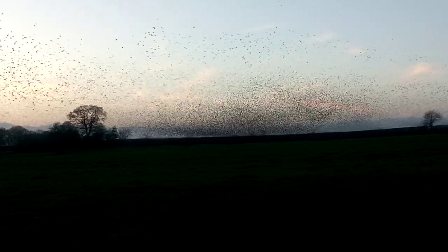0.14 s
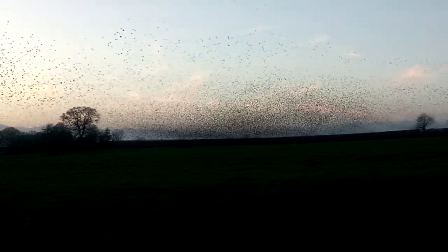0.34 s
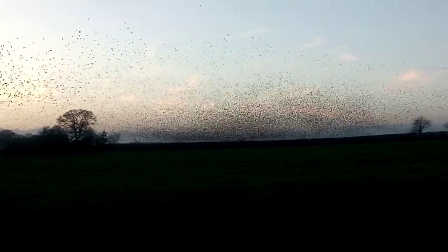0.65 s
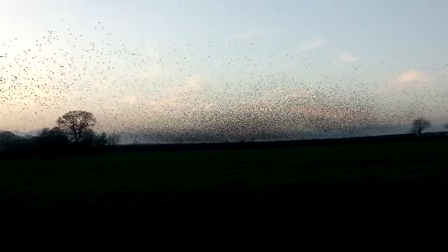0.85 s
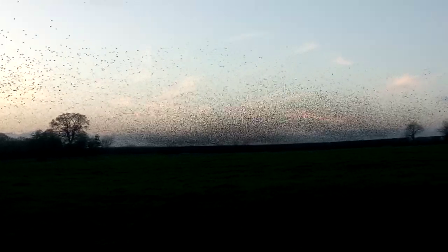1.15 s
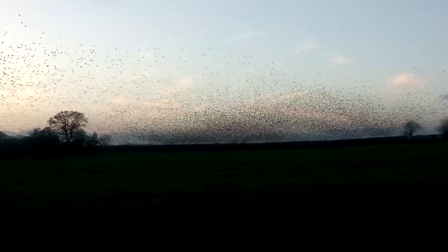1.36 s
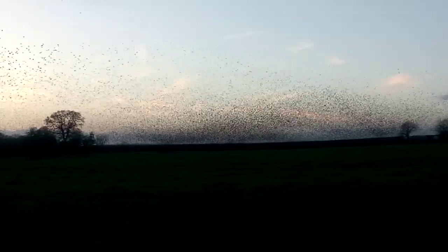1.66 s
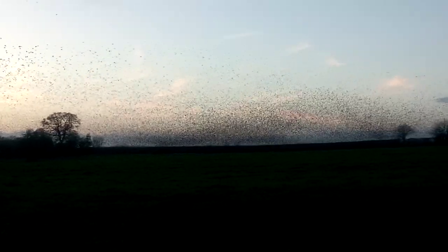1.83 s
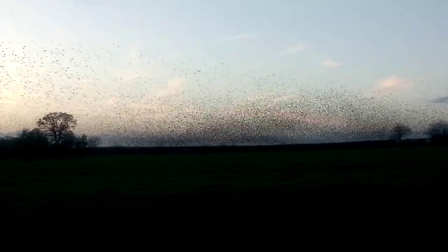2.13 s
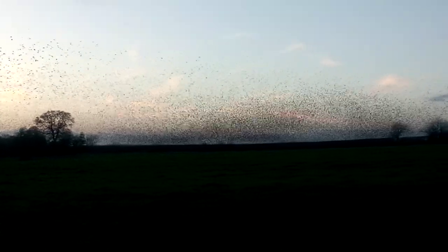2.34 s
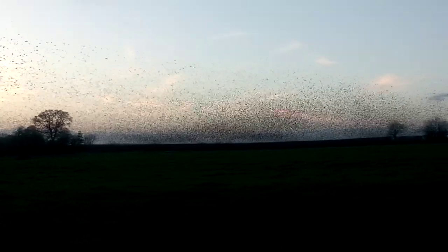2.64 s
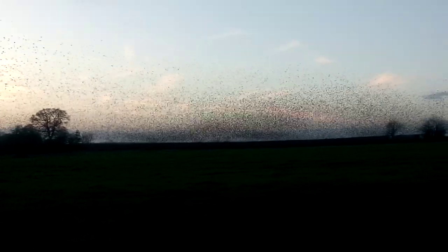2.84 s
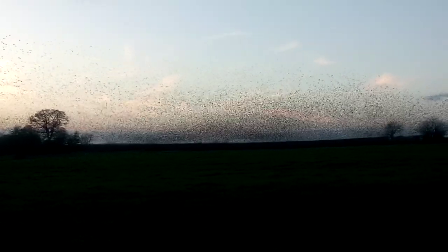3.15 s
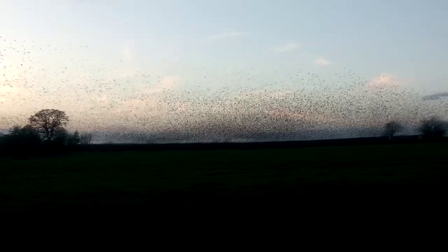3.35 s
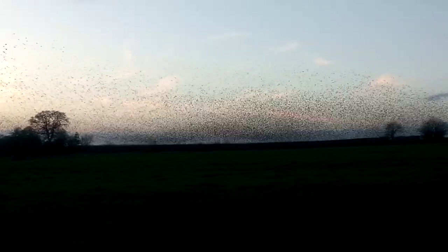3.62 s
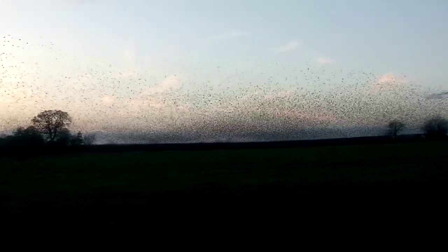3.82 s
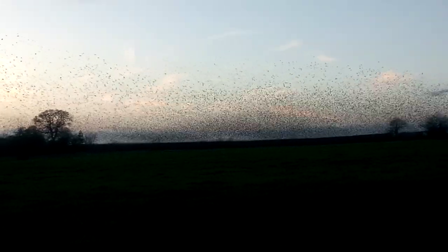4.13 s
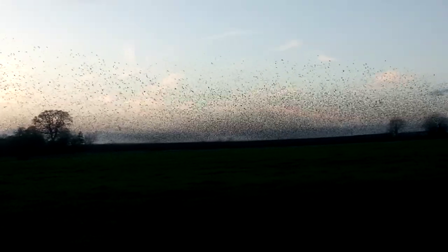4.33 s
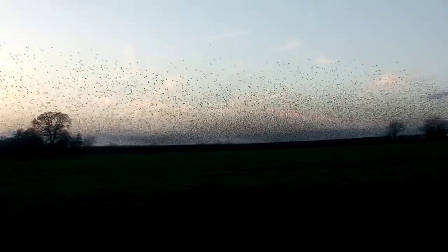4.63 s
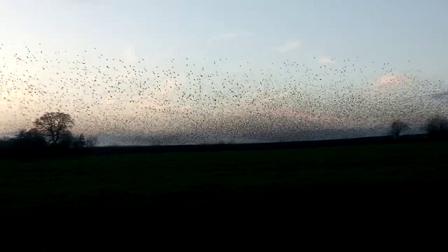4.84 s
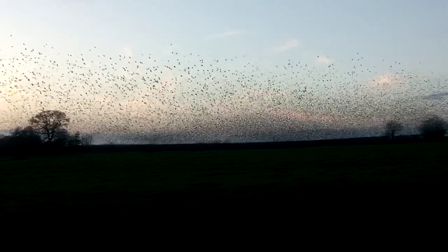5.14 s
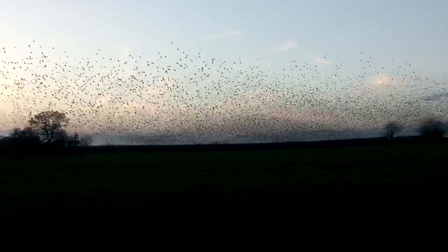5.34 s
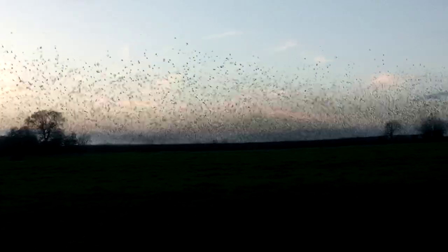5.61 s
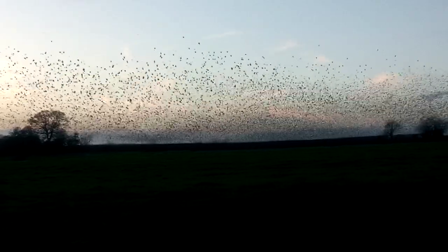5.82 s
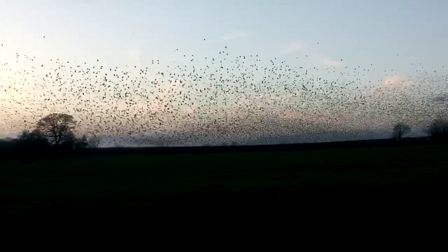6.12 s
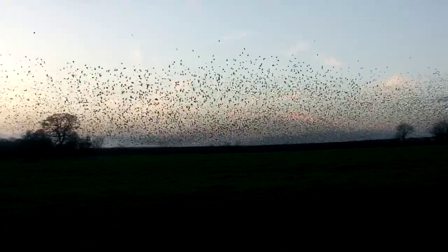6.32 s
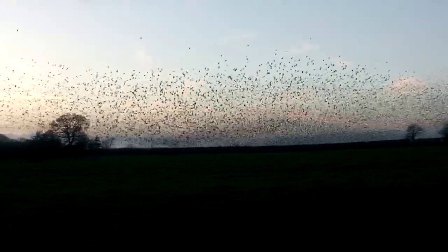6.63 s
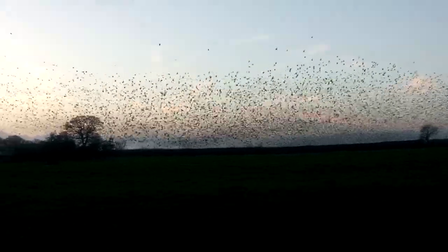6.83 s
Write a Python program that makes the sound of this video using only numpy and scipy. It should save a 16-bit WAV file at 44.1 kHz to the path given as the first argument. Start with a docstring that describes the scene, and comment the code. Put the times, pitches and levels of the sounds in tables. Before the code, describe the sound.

Thousands of starlings over an open field make a continuous bright hiss of wings and blurred chatter. Quick falling chirps and warbles cluster in the first second, then a near bird sings a sharp, fast gliding phrase. Low wind and gusts buffet the microphone, with one heavy double bump midway that briefly dips the sound. More whistles and chirps follow, a far hoarse double call, and the near phrase returns at the end.

```python
"""A huge starling flock wheels over a field at dusk: filtered noise makes a steady hiss of wings and far chatter.
Short gliding tones add twitters, whistles, buzzes, chirps and warbles; filtered noise adds a far rush and wind.
Gusts and bumps strike the microphone; a near bird sings a sharp phrase of gliding tones.
The hardest bumps, halfway, duck the recorder's gain; later a far bird gives a hoarse double call of harmonics.
Faint far tones follow, and the near bird repeats most of its phrase."""
import sys
import numpy as np
from scipy import signal
from scipy.fft import rfft, irfft
from scipy.io import wavfile
from scipy.ndimage import uniform_filter1d

SR = 44100
rng = np.random.default_rng(int(sys.argv[2]) if len(sys.argv) > 2 else 0)


def materialize(psi):
    """Save the field psi as 16-bit PCM at rate SR to the path in sys.argv[1].

    A 1-D psi becomes a single channel; in a 2-D psi each row is a channel.
    """
    bounded = np.clip(np.atleast_2d(psi).T, -1, 1)
    quanta = np.round(bounded * 32767).astype(np.int16)
    wavfile.write(sys.argv[1], SR, quanta)


N = 307377
TIME = np.arange(N) / SR
BINS = np.fft.rfftfreq(N, 1 / SR)

# flock loudness over time, before trims: time_s, wings_db, chatter_db
FLOCK_LEVELS = [(0, -57, -55), (.7, -58, -57.5), (1.4, -59.5, -57.5), (3.3, -59, -57.5),
                (4.2, -56.5, -55.5), (5, -56.5, -56.5), (5.7, -59, -57.5), (6.97, -61, -56.5)]


def gain_of(db):
    """Decibels to amplitude."""
    return 10 ** (np.asarray(db) / 20)


def evened(x):
    """Scales to an rms of one."""
    return x / np.sqrt(np.mean(x ** 2) + 1e-20)


def read(points, hz):
    """Reads a spectrum on a log-frequency axis."""
    point_hz, value = np.transpose(points)
    return np.interp(np.log(hz + 1), np.log(point_hz + 1), value)


def add(mix, start_s, sound):
    """Mixes a sound in at a given time."""
    part = mix[max(round(start_s * SR), 0):][:len(sound)]
    part += sound[:len(part)]


def filtered(x, gain):
    """Applies a gain to each frequency bin."""
    return irfft(rfft(x) * gain, N)


def noise(gain):
    """Steady noise of unit rms with the given gain on each frequency bin."""
    return evened(filtered(rng.standard_normal(N), gain))


def wander(rate_hz):
    """A smooth random curve of unit rms."""
    return noise(np.exp(-(BINS / rate_hz) ** 2))


def patchy(colour, patchy_db, patch_s, patch_hz):
    """Noise whose level drifts in small patches of time and frequency."""
    hz, t, z = signal.stft(rng.standard_normal(N), SR, nperseg=512, noverlap=384)
    patch_frames = max(round(patch_s / t[1]), 1)
    patch_bins = max(round(patch_hz / hz[1]), 1)
    patches = uniform_filter1d(rng.standard_normal(z.shape), patch_frames, axis=1)
    patches = evened(uniform_filter1d(patches, patch_bins, axis=0))
    z = z * gain_of(read(colour, hz)[:, None] + patchy_db * patches)
    return signal.istft(z, SR, nperseg=512, noverlap=384)[1][:N]


def band_rms(x, low_hz, high_hz):
    """Strength of x between two frequencies."""
    return np.std(filtered(x, (BINS > low_hz) * (BINS < high_hz)))


def field(x, wet_db, t60_s):
    """Sparse echoes scattered by the ground, hedges and trees."""
    t = TIME[:SR]
    taps = rng.choice([-1., 1.], SR) * (rng.random(SR) < 2000 / SR) * (t > .002)
    tail = taps * gain_of(-60 * t / t60_s)
    return x + gain_of(wet_db) * signal.fftconvolve(x, tail / np.linalg.norm(tail))[:N]


def slur(length_s, start_hz, middle_hz, end_hz, warble=0, warble_per_s=0):
    """One pure note whose pitch bends through three points and may warble on the way."""
    u = np.linspace(0, 1, max(int(length_s * SR), 8))
    hz = np.polyval(np.polyfit([0, .5, 1], [start_hz, middle_hz, end_hz], 2), u)
    hz = hz * (1 + warble * np.sin(2 * np.pi * warble_per_s * length_s * u))
    return np.sin(2 * np.pi * np.cumsum(hz) / SR) * signal.windows.tukey(len(u), .5)


def slurs(rows):
    """Plays a table of bending notes."""
    out = np.zeros(N)
    for start_s, length_s, start_hz, middle_hz, end_hz, db in rows:
        add(out, start_s, gain_of(db) * slur(length_s, start_hz, middle_hz, end_hz))
    return out


def flock(split_hz=3600, wings_db=-0.52, chatter_db=-3.0):
    """Thousands of wings make the lower hiss; thousands of far calls blur into the upper one."""
    # hiss spectrum: freq_hz, density_rel_db
    hiss_colour = [(290, -19), (500, -17.5), (644, -10.5), (998, -20), (1140, -12.5), (1510, -12.5),
                   (1940, -1.5), (2430, 0.5), (3480, -5), (4730, 2.5), (6340, -5), (7640, -16), (8720, -26),
                   (9320, -43), (12000, -61), (22000, -120)]
    time_s, wing_level, chatter_level = np.transpose(FLOCK_LEVELS)
    hiss = patchy(hiss_colour, patchy_db=1.62, patch_s=0.038, patch_hz=350)
    wings = filtered(hiss, 1 / (1 + (BINS / split_hz) ** 8))
    far_calls = hiss - wings
    wing_gain = gain_of(np.interp(TIME, time_s, wing_level) + wings_db)
    call_gain = gain_of(np.interp(TIME, time_s, chatter_level) + chatter_db)
    return (wings / band_rms(hiss, 1800, 3200) * wing_gain
            + far_calls / band_rms(hiss, 4000, 7000) * call_gain)


def chatter(count=760, base_db=-59.7, spread_db=2.5, low_hz=2000, high_hz=7800, bend=0.17,
            air_db=-16, warble=.012, gap_s=.06, swell_db=1.6):
    """Birds each give three short twitters, fading; all swell together, and air dulls the high ones."""
    out = np.zeros(N)
    for when, height, length, sweep, arch, near, pace in rng.random((count, 7)):
        hz = low_hz + (high_hz - low_hz) * np.sqrt(height)
        tilt = bend * (sweep - .4) * (1 - height ** 2 / 2)
        middle_hz = hz * (1 + bend * (arch - .5) / 2)
        note = slur(0.01367 + 0.0399 * length ** 2, hz * (1 + tilt), middle_hz, hz * (1 - tilt),
                    warble, warble_per_s=60 * (.5 + pace))
        for k in range(3):
            start_s = when * N / SR + k * gap_s * (.5 + pace + length)
            db = base_db + spread_db * (2 * near - 1.5 - k / 2) + air_db * height ** 2
            add(out, start_s, note * gain_of(db))
    time_s, _, level = np.transpose(FLOCK_LEVELS)
    swell = np.interp(TIME, time_s, level - level.mean()) + swell_db * wander(rate_hz=3)
    return field(out * gain_of(swell), wet_db=-8, t60_s=0.45)


def wind(trim_db=3, lumpy_db=3.0):
    """Lumpy low-frequency turbulence at the microphone port."""
    # wind level before trim: time_s, level_db
    wind_levels = [(0.0, -60), (0.41, -53), (0.7, -62), (1.46, -55), (1.61, -50), (2.1, -57.5),
                   (2.55, -55.5), (2.8, -63), (3.2, -48.5), (3.55, -60.5), (5.61, -64.5), (6.05, -60),
                   (6.25, -56.5), (6.44, -66), (6.97, -64.5)]
    # wind spectrum: freq_hz, density_rel_db
    wind_colour = [(20, -44), (50, -1), (100, 1.5), (165, -6), (230, -16), (330, -25), (500, -41),
                   (900, -65.5)]
    level_db = np.interp(TIME, *np.transpose(wind_levels)) + trim_db
    return noise(gain_of(read(wind_colour, BINS))) * gain_of(level_db + lumpy_db * wander(rate_hz=12))


def microphone(hiss_db=-69.5):
    """The recorder's own faint hiss."""
    # hiss spectrum: freq_hz, density_rel_db
    hiss_colour = [(100, 29.5), (1000, -3), (9000, -8.5), (13500, -12), (14600, 5), (15700, 7),
                   (17000, -18)]
    return gain_of(hiss_db) * noise(gain_of(read(hiss_colour, BINS)))


def whistles():
    """Long thin bending notes from the edge of the flock."""
    # whistled notes: start_s, length_s, start_hz, middle_hz, end_hz, rel_level_db
    whistle_rows = [(0, 0.14, 5560, 5400, 5340, -51.5), (.407, 0.22, 8060, 8900, 8800, -76),
                    (.956, 0.28, 8940, 8990, 7900, -76), (4.36, 0.16, 4720, 4780, 4980, -52),
                    (4.37, 0.15, 4810, 5030, 5030, -50.5), (4.46, 0.18, 4930, 5030, 5090, -54.5),
                    (4.42, 0.17, 2495, 2543, 2500, -58), (5.07, 0.1, 4450, 3380, 4130, -57),
                    (5.571, 0.12, 7380, 6600, 6060, -51.5)]
    return slurs(whistle_rows)


def nearer_birds(flutter=0.32, trim_db=-1.5):
    """Nearer birds of the flock, fluttering or buzzing and half lost in echoes."""
    calls = whistles() + warbles() + chirps() + flurries()
    calls = calls * (1 + flutter * wander(rate_hz=280))
    return gain_of(trim_db) * field(calls + buzzes(), wet_db=-8, t60_s=.35)


def buzzes():
    """High calls: fast, uneven trembling spreads each note into a band."""
    # buzzy notes: start_s, length_s, start_hz, middle_hz, end_hz, rel_level_db
    buzz_rows = [(.12, 0.11, 7380, 6800, 6350, -54.5), (2.32, .1, 5920, 5700, 5500, -52.5),
                 (4.09, 0.3, 8200, 7420, 7200, -62), (4.62, 0.25, 6300, 5900, 5900, -55.5),
                 (6.09, 0.23, 8400, 7410, 7700, -61)]
    return slurs(buzz_rows) * wander(rate_hz=430)


def clamour(centre_hz=1520, width_hz=260):
    """A faint far rush, one band of noise low in the flock's sound, that comes and goes."""
    # rush level: time_s, level_db
    clamour_levels = [(0, -106), (.15, -63), (.5, -60.5), (.9, -71.5), (1.2, -105), (3.9, -74), (4.35, -65),
                      (4.7, -77)]
    band = noise(np.exp(-((BINS - centre_hz) / width_hz) ** 2))
    return band * gain_of(np.interp(TIME, *np.transpose(clamour_levels)))


def chirps(length_s=.046):
    """Single quick chirps of passing birds, equally long, gliding straight up or down."""
    # chirps: start_s, middle_hz, glide_hz_per_s, rel_level_db
    chirp_rows = [(.195, 5420, -9000, -52), (.36, 4310, -30000, -53), (.575, 5790, -11000, -47),
                  (.64, 5450, -21000, -46), (.715, 5720, -9000, -48.5), (.88, 4540, -17000, -51),
                  (.953, 5170, -21000, -47.5), (1.008, 4990, -24000, -51), (1.08, 5330, -16000, -53),
                  (4.725, 5250, 20000, -55), (4.752, 3800, -36000, -52), (4.91, 5200, 24000, -50.5),
                  (4.968, 5150, -20000, -53), (5.272, 5380, -19000, -48)]
    notes = []
    for start_s, hz, glide, db in chirp_rows:
        half_glide_hz = glide * length_s / 2
        notes.append((start_s, length_s, hz - half_glide_hz, hz, hz + half_glide_hz, db))
    return slurs(notes)


def flurries(per_s=60, spread=0.15, bend=0.0856, spread_db=4):
    """Bursts of short overlapping chirps as birds pass nearer; most chirps fall in pitch."""
    # bursts, centre of each spread: start_s, end_s, pitch_hz, rel_level_db
    flurry_rows = [(0.35, .76, 4770, -54.5), (0.854, 1.2, 5060, -55), (4.701, 5.348, 4494, -56.5),
                   (5.201, 5.456, 6500, -59)]
    out = np.zeros(N)
    for start_s, end_s, hz, db in flurry_rows:
        for s in np.arange(start_s, end_s, 1 / per_s):
            late, height, length, sweep, arch, near = rng.uniform(-1, 1, 6)
            pitch_hz = hz * (1 + spread * height)
            tilt = bend * (sweep + 1 / 2)
            note = slur(0.0245 + .012 * length, pitch_hz * (1 + tilt),
                        pitch_hz * (1 + bend * arch / 2), pitch_hz * (1 - tilt))
            add(out, s + late / per_s, note * gain_of(db + spread_db * near))
    return out


def warbles(swings_per_s=31, depth=0.0251, uneven=0.0202):
    """A held note swings quickly and unevenly in pitch, and is loudest at the top of each swing."""
    # warbled calls: start_s, length_s, mean_pitch_hz, rel_level_db
    warble_rows = [(.35, 0.25, 4430, -54), (.58, .3, 5620, -52), (4.9, .21, 5040, -54.5)]
    out = np.zeros(N)
    drift = 1 + uneven * wander(rate_hz=60)
    swing_hz = swings_per_s * (1 + .5 * wander(rate_hz=20))
    swing = np.sin(2 * np.pi * np.cumsum(swing_hz) / SR)
    for start_s, length_s, hz, db in warble_rows:
        part = slice(round(start_s * SR), round((start_s + length_s) * SR))
        pitch_hz = hz * drift[part] * (1 + depth * swing[part])
        tone = np.sin(2 * np.pi * np.cumsum(pitch_hz) / SR)
        loudness = (1 + swing[part] / 2) * signal.windows.tukey(len(tone), .5)
        add(out, start_s, gain_of(db) * tone * loudness)
    return out


def gusts(low_cut_hz=85):
    """Gusts that strike the microphone: band noise in a bell-shaped swell."""
    # gusts: centre_s, centre_rms_db, bell_sigma_s, upper_edge_hz
    gust_rows = [(.655, -46.5, 0.0096, 230), (0.966, -40.5, 0.018, 357), (1.03, -38, 0.019, 254),
                 (2.247, -39, 0.0097, 244), (2.359, -45, 0.00903, 212), (2.46, -44, 0.017, 154),
                 (3.219, -26, .017, 348), (3.275, -38.5, 0.018, 203), (6.215, -44.5, .022, 228)]
    out = np.zeros(N)
    for centre_s, db, sigma_s, edge_hz in gust_rows:
        t = np.arange(-4 * sigma_s, 4 * sigma_s, 1 / SR)
        band = signal.butter(5, [low_cut_hz, edge_hz], "band", fs=SR, output="sos")
        swell = np.exp(-(t / sigma_s) ** 2 / 2)
        puff = signal.sosfilt(band, rng.standard_normal(SR))[-len(t):] * swell
        add(out, centre_s + t[0], gain_of(db) * evened(puff) * np.sqrt(np.mean(swell ** 2)))
    return out


def knocks(edge_ratio=3.18):
    """Bumps and ticks on the recorder's body: a push with a quicker, harder edge.

    The dip on either side is where the microphone sheds its bass."""
    # knocks: centre_s, push_peak_db, push_hz, edge_db_re_push
    knock_rows = [(1.034, -30.5, 128, -40), (1.3093, -39.5, 440, 4), (1.481, -45, 510, -12),
                  (3.2214, -9.5, 136, -14), (3.2344, -9.5, 126, -15)]
    out = np.zeros(N)
    t = np.arange(-.02, .02, 1 / SR)
    for centre_s, db, hz, edge_db in knock_rows:
        push = (np.pi * hz * t) ** 2
        edge = (np.pi * hz * edge_ratio * t) ** 2
        pulse = (1 - 2 * push) * np.exp(-push) + gain_of(edge_db) * (1 - 2 * edge) * np.exp(-edge)
        add(out, centre_s + t[0], gain_of(db) * pulse)
    return out


def syllable(length_s, start_hz, turn_hz, end_hz, turn, ease, bend, accent, swell_db,
             attack_s=0.0028, release_s=0.0022):
    """Time, pitch and loudness: pitch eases into its turn, bends away; level swells towards the accent."""
    t = np.arange(0, length_s, 1 / SR)
    u = t / length_s
    before = np.maximum(1 - u / turn, 0)
    after = np.maximum((u - turn) / (1 - turn), 0)
    hz = turn_hz + (start_hz - turn_hz) * before ** ease + (end_hz - turn_hz) * after ** bend
    away = abs(u - accent)
    gate = np.minimum(np.minimum(t / attack_s, (length_s - t) / release_s), 1)
    return t, hz, gate * gain_of(-swell_db * away / away.max())


def singer(jitter=0.006, second_db=-30, third_db=-39, rasp_db=-17, rasp_hz=650, tremble_db=1.5):
    """A near bird: a trembling, gliding tone with faint overtones, which rasps where pitch moves fast."""
    # syllables by name, pitches before pitch_factor, turn and accent as shares of length (accent may
    # lie past the end); higher ease settles sooner, bend under 1 leaves at once, over 1 late:
    # length_s, start_hz, turn_hz, end_hz, turn, ease, bend, accent, swell_db
    syllable_shapes = { "swoop": (0.14, 5400, 4645, 5750, .42, 2, 2.6, 1.04, 7.7),
                       "flick": (.01, 5600, 6500, 7400, .5, 0.9, 1.1, 0.48, 7.6),
                       "peak": (.036, 8420, 6850, 7150, .75, 1.3, 1.1, 0.69, 22.8),
                       "drop": (0.0356, 6100, 5290, 5500, 0.44, 2.66, 1.7, 0.086, 11),
                       "hitch": (.013, 3100, 4100, 4250, .6, 1.5, 1, 0.54, 6),
                       "chip": (0.0208, 4850, 3900, 3640, 0.667, 1.22, 1, 0.52, 15.4),
                       "level": (0.0455, 4850, 5200, 5130, 0.55, 1.4, 1.9, 0.55, 9.8),
                       "lift": (0.013, 3550, 3420, 4020, 0.32, 1.5, 1.6, 1, 6.6),
                       "rise": (.049, 3750, 4480, 4200, .3, 2, 2.5, 0.15, 6.4),
                       "scoop": (0.0275, 5950, 5430, 5950, .5, 2.1, 2.2, 0.97, 7.4),
                       "fall": (0.0243, 5700, 4850, 4600, .65, 1.3, 1.5, 0.33, 9),
                       "tseep": (.031, 5980, 5600, 5720, .6, 2, 2.7, 0.83, 14.5),
                       "arch": (.02, 2700, 4650, 2770, 0.465, 2.18, 2.44, 1.2, 2.6),
                       "pip": (0.017, 2700, 3220, 2900, .5, 1.9, 2.4, .5, 17.4), }
    # song: start_s, syllable_name, accent_rel_db, pitch_factor
    song_rows = [(1.484, "swoop", -34, 1), (1.679, "flick", -35, 0.94), (1.692, "peak", -24.5, 0.95),
                 (1.729, "drop", -31.5, 1), (1.802, "hitch", -42, 1.01), (1.821, "chip", -30.5, 1),
                 (1.877, "level", -35.5, .99), (1.895, "drop", -37, 1.01), (1.912, "lift", -32, 1.02),
                 (1.927, "rise", -35.5, 1.01), (2.011, "scoop", -31, 1), (2.037, "fall", -31.5, .99),
                 (2.064, "hitch", -37.5, 1), (2.073, "fall", -31, 1.01), (2.136, "tseep", -25.5, 1),
                 (2.165, "fall", -33, 1.02), (2.238, "arch", -36.5, 1), (2.279, "pip", -33.5, 1),
                 (2.319, "pip", -39, 0.94), (2.359, "pip", -45.5, 0.91), (6.401, "swoop", -34, 1.05),
                 (6.595, "flick", -29, 0.97), (6.602, "peak", -20, 0.98), (6.638, "fall", -27, 1.173),
                 (6.705, "hitch", -38, 1.01), (6.724, "chip", -30, 1.01), (6.775, "level", -26.5, 1.001),
                 (6.813, "lift", -36.5, 0.99), (6.825, "rise", -30.5, 1.005), (6.911, "scoop", -34, 0.99),
                 (6.936, "fall", -28, 1.005)]
    # song filter: freq_hz, gain_db
    song_colour = [(8300, 0.5), (9000, 7.5), (9500, -16), (10700, -3), (13000, -31), (15500, 12.5)]
    out = np.zeros(N)
    waver = 1 + jitter * wander(rate_hz=930)
    rasp = gain_of(rasp_db) * wander(rate_hz=rasp_hz)
    for start_s, name, db, pitch_factor in song_rows:
        t, hz, loudness = syllable(*syllable_shapes[name])
        glide_hz = uniform_filter1d(hz, size=100) * pitch_factor
        strain = np.minimum(.4 + abs(np.gradient(glide_hz)) * SR / 60000, 3)
        phase = 2 * np.pi * np.cumsum(glide_hz * np.interp(start_s + t, TIME, waver)) / SR
        second = gain_of(second_db) * np.sin(2 * phase)
        third = gain_of(third_db) * np.sin(3 * phase) * (3 * glide_hz < SR / 2)
        tone = np.sin(phase) + second + third
        tone = tone * (1 + strain * np.interp(start_s + t, TIME, rasp))
        add(out, start_s, tone * loudness * gain_of(db))
    out = out * gain_of(tremble_db * wander(rate_hz=330))
    out = filtered(out, gain_of(read(song_colour, BINS)))
    close = field(out, wet_db=-10, t60_s=.09)
    return field(close, wet_db=-8, t60_s=0.23)


def croaker(rough=0.073, arch=0.27, hoarse=1.2):
    """A far, hoarse double call: notes start hard and arch in pitch through a narrow throat."""
    # hoarse notes, pitch at 0.8 of the swell: start_s, length_s, pitch_hz, rel_level_db
    croak_rows = [(5.589, 0.019, 448, -42), (5.618, 0.019, 469, -43), (5.728, 0.032, 441, -45.5),
                  (5.76, 0.017, 462, -42)]
    # throat resonances: centre_hz, width_hz, rel_gain_db
    throat_rows = [(900, 210, -1.5), (1415, 160, -0.5), (2550, 660, -12)]
    out = np.zeros(N)
    waver = 1 + rough * wander(rate_hz=240)
    for start_s, length_s, hz, db in croak_rows:
        swell = np.sin(np.pi * np.sqrt(np.linspace(0, 1, int(length_s * SR)))) ** 2
        pitch_hz = hz * (1 + arch * (swell - .8)) * waver[round(start_s * SR):][:len(swell)]
        phase = 2 * np.pi * np.cumsum(pitch_hz) / SR
        voice = sum(np.cos(k * phase) for k in range(1, 8))
        breath = 1 + hoarse * rng.standard_normal(len(swell))
        add(out, start_s, gain_of(db) * voice * breath * swell)
    throat = sum(gain_of(db) / (1 + (2 * (BINS - hz) / width_hz) ** 2)
                 for hz, width_hz, db in throat_rows)
    return field(filtered(out, throat), wet_db=-4.0, t60_s=0.37)


def far_tones():
    """Faint far-off bending tones that waver in level."""
    # tones: start_s, length_s, start_hz, middle_hz, end_hz, rel_level_db
    tone_rows = [(6.35, 0.12, 1487, 1510, 1560, -58.5), (6.36, .75, 1118, 1113, 1132, -70.5)]
    return slurs(tone_rows) * (.8 + .35 * wander(rate_hz=22))


def scene():
    """Birds far and near, faint wavering tones in the distance, and the wind."""
    birds = flock() + chatter() + nearer_birds() + singer() + croaker()
    distance = clamour() + far_tones()
    at_microphone = wind() + gusts() + knocks() + microphone()
    return (birds + distance + at_microphone)[None]


def record(dry, threshold_db=-27, recovery_db_per_s=170, share=0.69, bass_cut_hz=42, edge_hz=15900):
    """Sheds deep bass, ducks everything briefly after the loudest peaks, then limits the band."""
    dry = filtered(dry, 1 - 1 / (1 + (BINS / bass_cut_hz) ** 4))
    power_db = 10 * np.log10(signal.lfilter(np.ones(400) / 400, 1, dry[0] ** 2) + 1e-12)
    # peak hold that falls at the recovery rate
    fall_db = TIME * recovery_db_per_s
    held_db = np.maximum.accumulate(power_db + fall_db) - fall_db
    over_db = np.maximum(held_db - threshold_db, 0)
    ducked = dry / gain_of(share * uniform_filter1d(over_db, size=100))
    low_pass = signal.firwin(511, edge_hz, window=("kaiser", 9), fs=SR)
    return signal.oaconvolve(ducked, low_pass[None], "same")


dry = scene()
out = record(dry)
materialize(out)
```